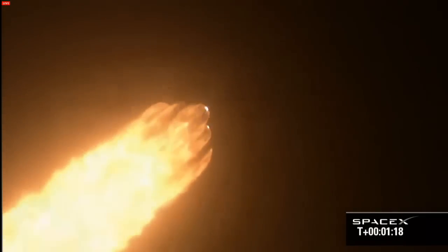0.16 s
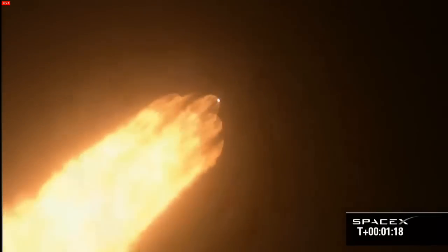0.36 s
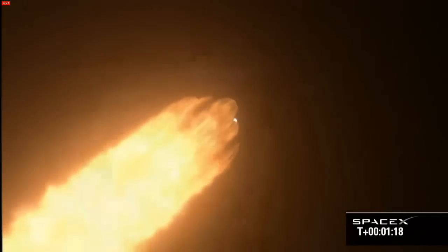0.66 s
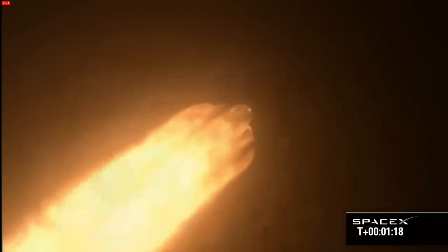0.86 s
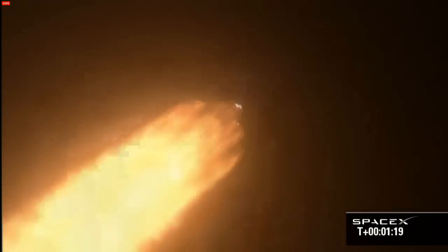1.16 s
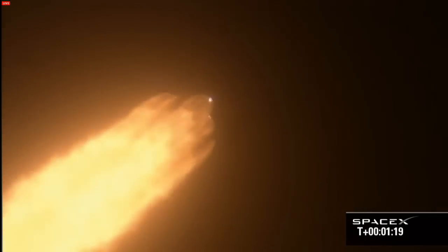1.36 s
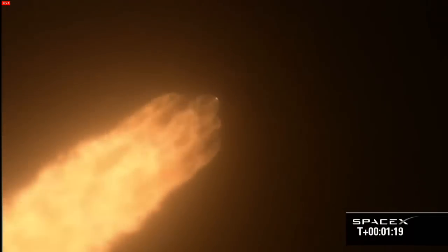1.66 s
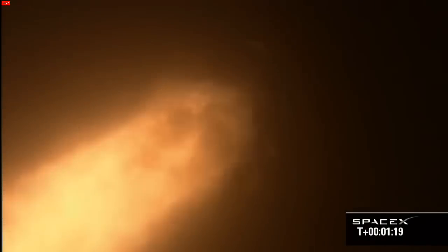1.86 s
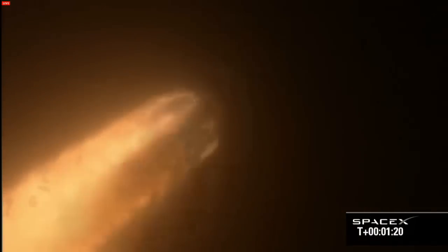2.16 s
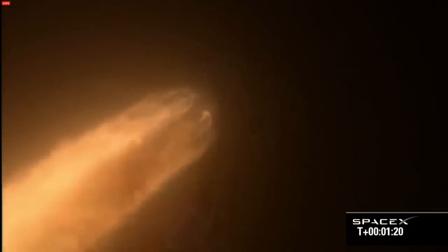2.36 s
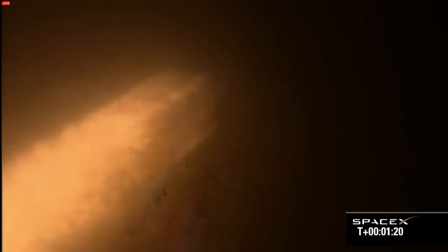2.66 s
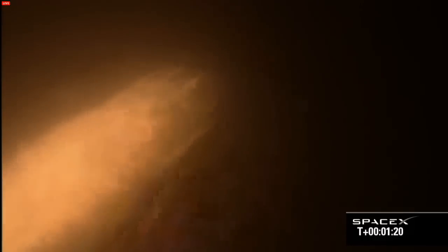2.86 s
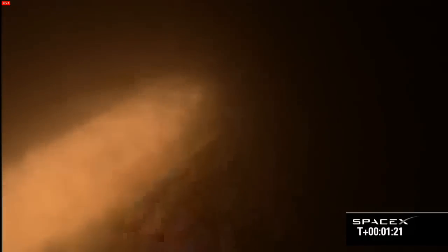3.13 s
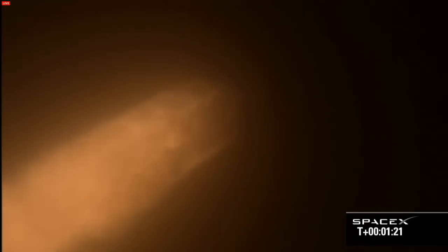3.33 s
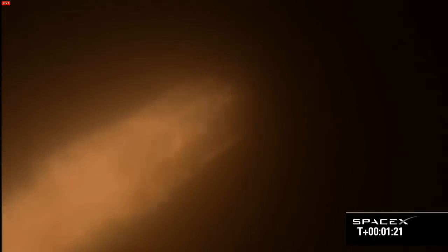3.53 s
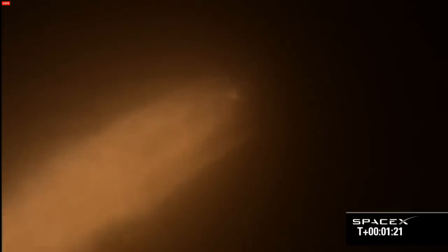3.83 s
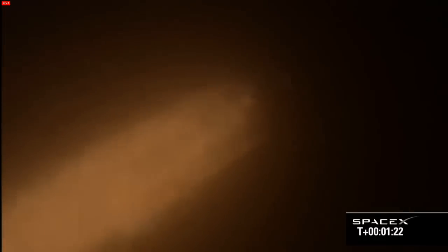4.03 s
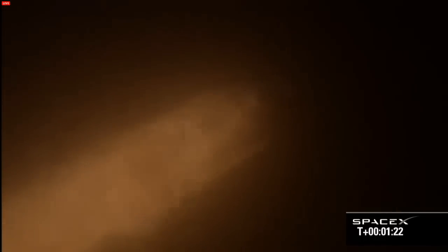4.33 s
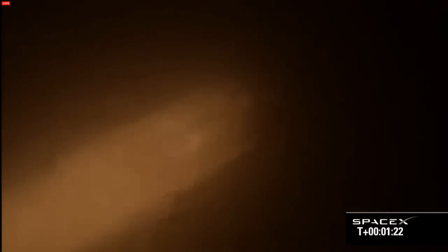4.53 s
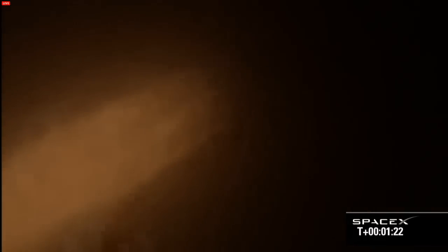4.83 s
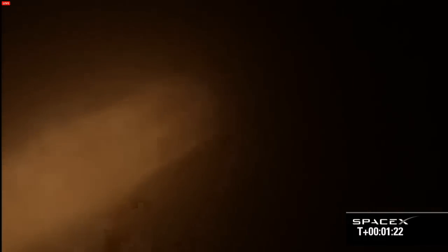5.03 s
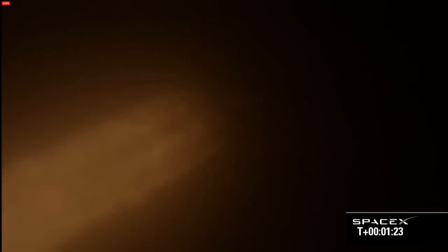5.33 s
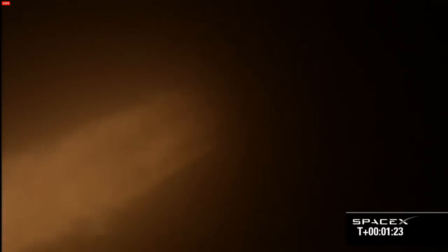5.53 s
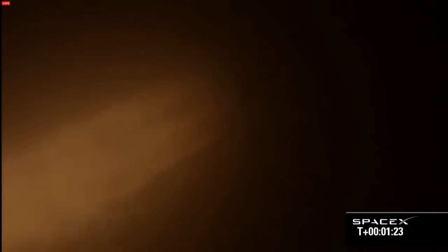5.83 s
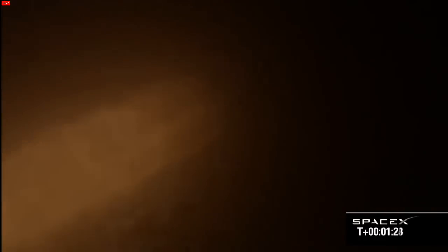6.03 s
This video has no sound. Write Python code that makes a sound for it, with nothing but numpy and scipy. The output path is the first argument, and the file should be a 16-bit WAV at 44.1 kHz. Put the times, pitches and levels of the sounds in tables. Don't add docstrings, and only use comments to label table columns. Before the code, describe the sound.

Outdoors at night, a faraway rocket's exhaust rumbles as deep, lumpy bass with almost no treble. It begins moderate, wavers, then swells from about four seconds to a heavy surge, shaking a faint rattle loose near the stereo microphone. Very quiet crickets trill and chirp in a wide soft field hiss, which dips slightly as the rumble peaks.

```python
import sys
import numpy as np
from scipy import signal
from scipy.fft import rfft, irfft, next_fast_len
from scipy.io import wavfile
from scipy.ndimage import uniform_filter1d

SR = 44100
rng = np.random.default_rng(int(sys.argv[2]) if len(sys.argv) > 2 else 0)


def invert_db(x):
    u = np.asarray(x, float) / 20
    return 10 ** u


def wrap_up_sound(samples):
    columns = np.atleast_2d(samples).T
    tamed = np.clip(columns, -1, 1)
    steps = np.round(tamed * 32767).astype(np.int16)
    wavfile.write(sys.argv[1], SR, steps)


N = 272888
TIME_S = np.arange(N) / SR
LEFT_RIGHT = np.array([[1], [-1]])


def read(points, hz):
    f, value = np.transpose(points)
    return np.interp(np.log(hz + 1), np.log(f + 1), value)


def curve(rows):
    start_s, level_db = np.transpose(rows)
    return np.interp(TIME_S, start_s, level_db)


def bumps(rows):
    t = np.arange(0, N, 64) / SR
    start_s, level_db, length_s = np.transpose(rows)[:, :, None]
    bells = level_db * np.exp(-((t - start_s) / length_s) ** 2)
    return np.interp(TIME_S, t, bells.sum(0))


def evened(x):
    return x / np.sqrt(np.mean(x ** 2) + 1e-20)


def coloured(x, gain_db):
    size = next_fast_len(N + SR // 2)
    gain = invert_db(gain_db(np.fft.rfftfreq(size, 1 / SR)))
    return irfft(rfft(x, size) * gain, size)[:N]


def turbulence(colour, lo, hi, steady, hold_s):
    x = coloured(rng.standard_normal(N), lambda f: np.where((f >= lo) & (f < hi), read(colour, f), -200))
    hold = int(hold_s * SR)
    swell = uniform_filter1d(uniform_filter1d(x ** 2, hold), hold)
    return evened(x / (abs(swell) + 1e-20) ** (steady / 2))


# start_s, level_db
GAIN_DUCK = [(0, 0.3), (2.5, 0), (4.6, -0.5), (5.3, -1), (5.5, -3), (6.19, -5.5)]


def duck_db():
    return curve(GAIN_DUCK)


# pitch_hz, level_db (per Hz)
FIELD_COLOUR = [(300, -25), (500, -4.5), (1000, -2), (1600, -7.5), (2500, -13), (3500, -17), (4400, -19.5),
                (5000, -20), (5800, -24), (8500, -23.5), (10000, -25.5), (13000, -26.5), (16000, -27.5)]
# pitch_hz, level_db (side minus mid)
FIELD_WIDTH = [(60, -53.5), (110, -52.5), (200, -60), (380, -52.5), (700, -16), (1290, -23), (2380, -18.5),
               (4400, -6.5), (8120, -7.5), (15000, -7)]


def field():
    hz = np.fft.rfftfreq(512, 1 / SR)
    frames = N // 128 + 5
    a, b, c, d, patches = rng.standard_normal((frames, 257, 5)).T
    patches = evened(uniform_filter1d(uniform_filter1d(patches, 6, 0), 12, 1))
    flicker = evened(uniform_filter1d(rng.standard_normal(frames), 8))
    side_gain = invert_db(read(FIELD_WIDTH, hz) + 2.5)[:, None]
    z = np.array([a + 1j * b, (c + 1j * d) * side_gain])
    z = z * invert_db(read(FIELD_COLOUR, hz)[:, None] + 0.25 * patches + 0.19 * flicker)
    mid, side = signal.istft(z, nperseg=512, noverlap=384)[1][:, :N]
    return invert_db(-59.5 + 1.2 * duck_db()) * np.array([mid + side, mid - side]) / mid.std()


# pitch_hz, level_db
FAR_CRICKETS = [(6640, -76.5), (6740, -77), (6800, -71.5), (6880, -68.5), (6930, -74), (7000, -70.5),
                (7088, -71), (7160, -75.5), (7280, -77.5), (7380, -75.5)]


def chorus():
    out = np.zeros((2, N))
    for hz, db in FAR_CRICKETS:
        group, beat, rate, pace, pan = rng.random(5)
        groups = np.cos(2 * np.pi * (group + (2.8 + 1.1 * rate) * TIME_S))
        strokes = np.cos(2 * np.pi * (beat + (18 + 5 * pace) * TIME_S))
        gate = .5 + np.clip(groups + 0.53, 0, 1) * np.clip(strokes + 0.29, 0, 1)
        blur = coloured(rng.standard_normal(N), lambda f: -10 * np.log10(1 + ((f - hz) / 35) ** 4))
        blur = evened(blur)
        blur = blur + .22 * np.roll(evened(blur), 3000) * LEFT_RIGHT
        out += invert_db(db) * gate * blur * invert_db(2.5 * (pan - .5) * LEFT_RIGHT)
    throb_per_s, throb_at_s = 3.66, 2.72
    throb_db = 1.5 * np.cos(2 * np.pi * throb_per_s * (TIME_S - throb_at_s))
    return invert_db(-65.5 + 1.7 * duck_db() + throb_db) * evened(out)


def stroke(hz, length_s):
    t = np.arange(0, length_s, 1 / SR)
    return np.sin(2 * np.pi * hz * t * (1 - 0.1 * t)) * np.sin(np.pi * t / length_s) ** 1.2


# start_s, level_db (peak), pitch_hz
TWO_STROKE_CHIRPS = [(2.218, -60, 7200), (2.428, -59, 7210), (2.658, -59, 7210), (3.198, -58, 7230),
                     (3.433, -59, 7220), (3.658, -58, 7220), (4.888, -59, 7230), (5.122, -60, 7235),
                     (5.353, -61, 7235), (5.603, -64, 7230), (4.385, -73, 6370), (4.625, -73, 6370),
                     (4.888, -73, 6370), (5.163, -72, 6370), (5.445, -73, 6370), (5.735, -75, 6370),
                     (3.49, -73, 8560), (3.585, -72, 8560), (3.69, -71, 8560), (3.82, -73, 8560),
                     (.15, -60, 7110), (.59, -61, 7100), (.86, -59, 7100), (1.81, -59, 6930),
                     (1.47, -60, 6930), (.965, -61, 6930)]
# start_s, level_db (peak), pitch_hz
THREE_STROKE_CHIRPS = [(1.2, -61, 7250), (2.893, -59, 7220), (3.958, -59, 7220), (4.288, -59, 7230),
                       (4.608, -59, 7235), (5.823, -63, 7230)]
# start_s, level_db (peak), pitch_hz, cycles
GRASS_SNAPS = [
    (1.125, -51, 2400, 6),
    (1.443, -51, 2600, 7),
    (1.455, -55, 2300, 5),
    (1.507, -59, 3950, 40),
    (6.03, -54, 1000, 5),
]


def soloists():
    out = np.zeros(N + SR)
    for count, chirps in ((2, TWO_STROKE_CHIRPS), (3, THREE_STROKE_CHIRPS)):
        for start_s, db, hz in chirps:
            for k in range(count):
                sound = invert_db(db) * stroke(hz, .028)
                out[round((start_s + .046 * k) * SR):][:len(sound)] += sound
    for start_s, db, hz, cycles in GRASS_SNAPS:
        sound = invert_db(db) * stroke(hz, cycles / hz)
        out[round(start_s * SR):][:len(sound)] += sound
    return out[:N]


# start_s, level_db
EXHAUST_ARRIVAL = [(0, -4.5), (.3, -1), (1.2, -0.5), (2, -1.5), (2.7, 1.5), (3.6, 0), (4.1, 2), (4.7, 4),
                   (5.3, 5), (5.6, 4.5), (6.19, 4.5)]


def arrival_db():
    return curve(EXHAUST_ARRIVAL)


# pitch_hz, level_db (per Hz)
RATTLE_SPECTRUM = [(300, -19.5), (450, -2.5), (700, -5.5), (1000, -13.5), (1500, -20), (2500, -35)]
# centre_s, level_db, length_s
RATTLE_JOLTS = [
    (.01, 2, .02),
    (3.12, 6.5, .05),
    (4.65, 5, .08),
    (5.255, 9, .015),
    (5.39, 6.5, .12),
    (5.88, 3.5, 0.046),
    (6.04, 5.5, 0.036),
]


def rattle(low):
    crest = abs(low) / np.sqrt(uniform_filter1d(low ** 2, 8000) + 1e-9)
    shaken = evened((.9 + crest) * turbulence(RATTLE_SPECTRUM, 300, 2300, .1, .05))
    return invert_db(-65 + 0.92 * arrival_db() + bumps(RATTLE_JOLTS)) * shaken


# pitch_hz, level_db (per Hz)
ROAR_SPECTRUM = [(100, -30), (170, -1), (189, -4.5), (270, -9.5), (421, -28), (700, -45), (910, -66),
                 (1540, -120)]


def roar():
    level_db = -42.5 + 0.5 * arrival_db() + 0.55 * duck_db()
    return invert_db(level_db) * turbulence(ROAR_SPECTRUM, 180, 700, 0.2, 0.056)


# centre_s, level_db, pitch_hz, length_s
EDDY_SURGES = [(0.097, 6.5, 70, 0.027), (0.299, 5.5, 57, 0.14), (0.44, 2, 107.6, 0.09),
               (0.564, 10, 42.9, 0.036), (1.002, 9, 57, 0.059), (1.506, 9, 72.7, 0.03),
               (1.668, 22, 70, 0.019), (1.931, 6, 68.6, 0.046), (2.164, 14, 32, 0.018),
               (2.219, 7.5, 57, 0.016), (2.727, 6.5, 88, 0.03), (2.741, 10, 43.8, 0.041),
               (2.996, 5, 57, 0.028), (3.306, 8, 88, 0.05), (3.316, 5, 32, 0.016), (3.555, 8, 88, 0.016),
               (4.062, 6.5, 32, 0.21), (4.155, 4, 32, 0.048), (4.386, 10.5, 88, 0.02), (4.53, 8, 32, 0.064),
               (4.644, 6, 110, 0.018), (4.697, 7.5, 32, 0.021), (4.855, 4.5, 68.8, 0.018),
               (5.066, 4.5, 70, 0.011), (5.131, 3, 32, 0.025), (5.344, 11, 43, 0.13),
               (5.483, 3.5, 105.5, 0.067), (5.784, 1, 111, 0.025), (6.002, 6.5, 32, 0.036),
               (6.082, 3.5, 88, 0.057)]
# centre_s, level_db, pitch_hz, length_s
EDDY_LULLS = [(0.403, -14.5, 32, 0.031), (1.265, -10.5, 57, 0.04), (1.621, -10.5, 88, 0.068),
              (2.04, -7.5, 71.3, 0.047), (3.164, -10.5, 32, 0.025), (3.39, -16, 43.7, 0.051),
              (3.745, -10, 42.8, 0.05), (3.909, -3.5, 71.4, 0.05), (4.317, -11.5, 32, 0.08),
              (4.547, -8, 57, 0.021), (5.315, -11, 88, 0.019), (5.576, -6, 57, 0.035),
              (5.79, -8, 43.8, 0.047), (5.969, -10.5, 106, 0.059)]
# centre_s, level_db, pitch_hz, length_s
RUMBLE_SHIFTS = [(0.415, 4, 140, 0.03), (0.915, -4, 140, 0.08), (1.144, -0.8, 140, 0.12),
                 (1.655, -7, 140, 0.03), (1.821, -3.5, 140, 0.074), (2.029, 1, 140, 0.08),
                 (2.162, -2.5, 140, 0.03), (3.253, 0.5, 140, 0.054), (3.43, 6.5, 140, 0.03),
                 (3.715, 0, 140, 0.08), (3.93, 0, 140, 0.055), (4.083, 2.5, 140, 0.05),
                 (4.426, -5, 140, 0.03), (4.561, 3, 140, 0.088), (5.543, 0.5, 140, 0.12),
                 (5.995, -1, 140, 0.03),
                 (0.952, -2.5, 32, .1),
    (3.031, -3.5, 95, .07),
    (4.502, 2, 75, .08),
    (4.87, 3.5, 95, .035),
    (5.259, -3, 100, 0.064),
    (5.92, 3.5, 90, 0.14),
    (6.142, -6.5, 150, 0.069),
]


def layer_db(centre_hz, calm_db, follows):
    spread_octaves = 0.53
    eddies = []
    for start_s, db, hz, length_s in EDDY_SURGES + EDDY_LULLS + RUMBLE_SHIFTS:
        nearness = np.exp(-(np.log2(centre_hz / hz) / spread_octaves) ** 2)
        eddies.append((start_s, db * nearness, length_s))
    return calm_db + follows * arrival_db() + bumps(eddies)


# low_hz, high_hz
RUMBLE_BANDS = [(12, 45), (45, 72), (72, 108), (108, 182)]
# pitch_hz (centre), level_db (calm), follows (share of arrival swell)
RUMBLE_LAYERS = [
    (32, -29, 1.38),
    (57, -25, 1.52),
    (88, -26.5, 1.13),
    (140, -31.5, 0.67),
]
# pitch_hz, level_db (per Hz)
RUMBLE_SPECTRUM = [(8.2, -37), (14, -7.5), (43, -2), (65, 2.5), (83, -6), (162, -10.5), (200, -28.5),
                   (260, -56), (440, -120)]
# start_s, level_db (peak), pitch_hz
EDGE_CRESTS = [
    (0, -25.5, 59.8),
    (6.19, -8.5, 70.2),
]


def rumble():
    steadiness = [(0.93, 0.029), (0.41, 0.048), (0.75, 0.079), (0.77, 0.056)]  # (share levelled, s)
    low = np.zeros(N)
    for band, layer, steady in zip(RUMBLE_BANDS, RUMBLE_LAYERS, steadiness):
        low += invert_db(layer_db(*layer)) * turbulence(RUMBLE_SPECTRUM, *band, *steady)
    low = low - .1 * (low ** 2 - uniform_filter1d(low ** 2, 4000))
    low = signal.sosfilt(signal.butter(6, 230, fs=SR, output="sos"), low)
    for start_s, db, hz in EDGE_CRESTS:
        cycles = hz * (TIME_S - start_s)
        low = low + invert_db(db) * np.cos(2 * np.pi * cycles) * np.exp(-cycles ** 2)
    return low


def plume():
    low = rumble()
    return low + roar() + rattle(low)


def scene():
    return field() + chorus() + soloists() + plume()


CLOCK_MULTIPLES = (1, 2, 3, 4, 8, 9, 10, 14, 15)
CLOCK_WOBBLE = [-58.5, -62.5, -66.5, -69.5, -76, -77.5, -77.5, -81, -82]


def mirrored(x):
    slope = np.gradient(x, axis=1) * SR / (2 * np.pi * 70)
    turn = 2 * np.pi * (48000 - SR) * TIME_S
    wobble = sum(invert_db(db) * np.sin(k * turn) for k, db in zip(CLOCK_MULTIPLES, CLOCK_WOBBLE))
    ripple = invert_db(-59) * np.cos(turn)
    return x + 2 * wobble * slope + 2 * ripple * x


def top_cut(x):
    return signal.sosfilt(signal.butter(12, 15740, fs=SR, output="sos"), x)


# start_s, level_db (left minus right)
LEFT_SAG = [(0, 0), (4.2, -.01), (5, -.04), (5.15, -.12), (5.27, -.75), (5.42, -1.08), (6.2, -1.08)]
# start_s, level_db
SURGE_CLICKS = [
    (5.255, -25.5),
    (5.347, -23),
    (5.415, -24),
]
# pitch_hz, level_db (rms)
ELECTRONIC_WHINES = [(8139, -92), (12378, -96)]


def record(dry):
    x = dry * invert_db(curve(LEFT_SAG) * .5 * LEFT_RIGHT)
    clicks = sum(invert_db(db) * np.exp(-((TIME_S - start_s) / .0005) ** 2) for start_s, db in SURGE_CLICKS)
    x = x + clicks * np.array([[-.8], [1.2]])
    shared, apart = rng.standard_normal((N, 2)).T
    x = x + invert_db(-87 + .3 * duck_db()) * (shared + .3 * apart * LEFT_RIGHT)
    for hz, db in ELECTRONIC_WHINES:
        x = x + np.sqrt(2) * invert_db(db) * np.sin(2 * np.pi * hz * TIME_S)
    return top_cut(mirrored(x))


dry = scene()
out = record(dry)
wrap_up_sound(out)
```